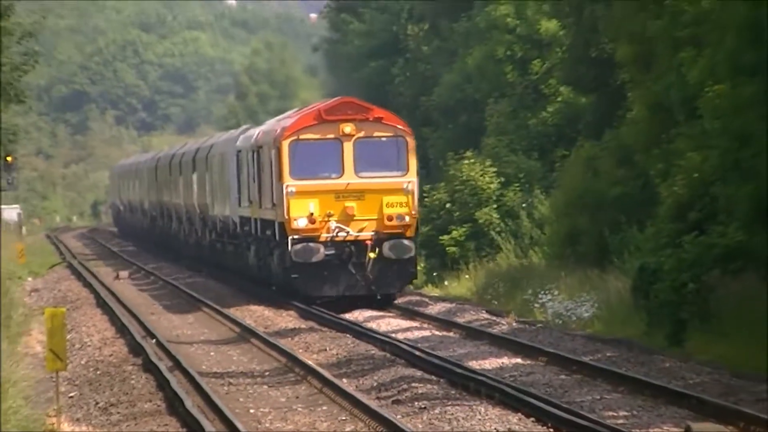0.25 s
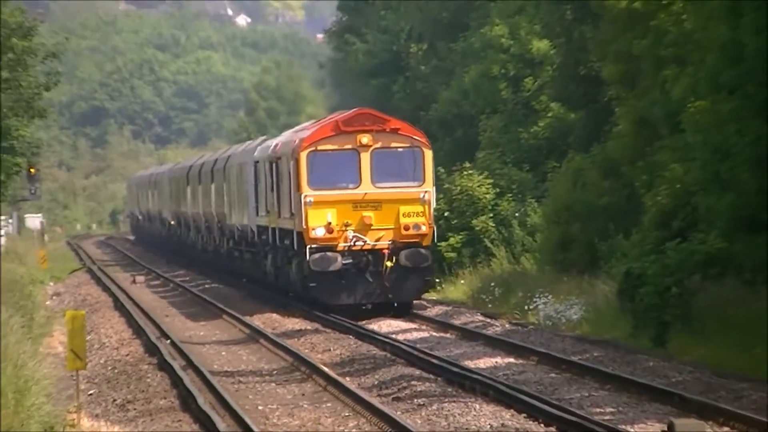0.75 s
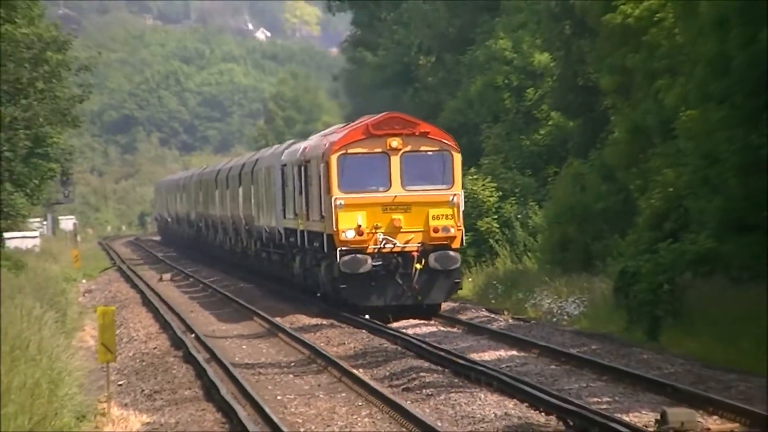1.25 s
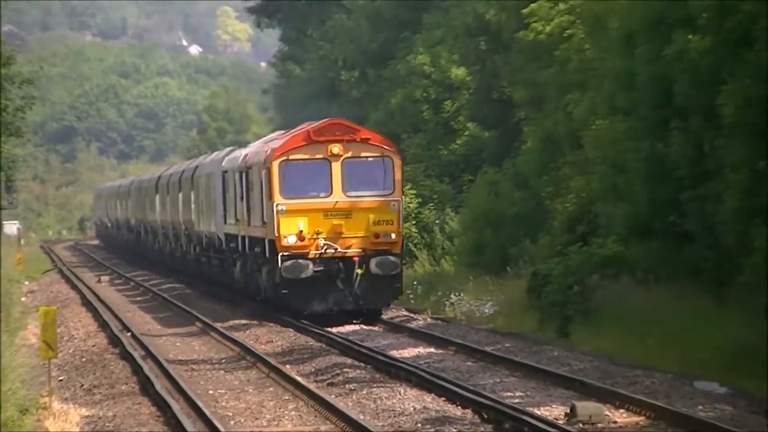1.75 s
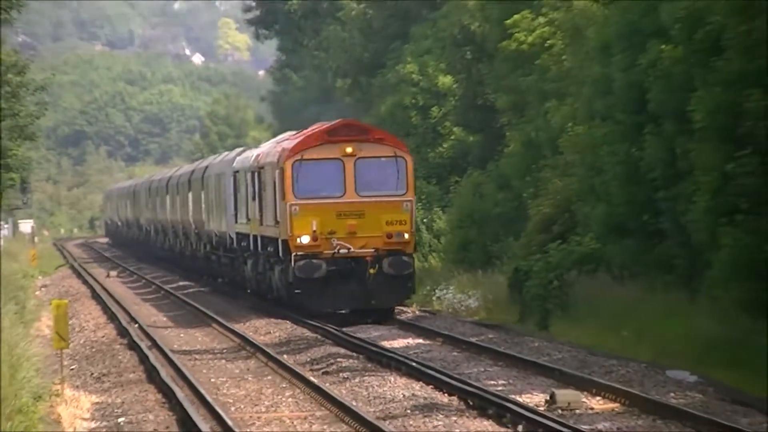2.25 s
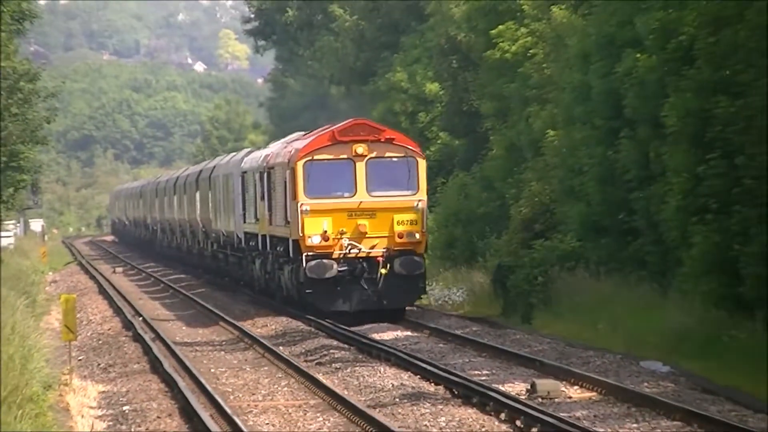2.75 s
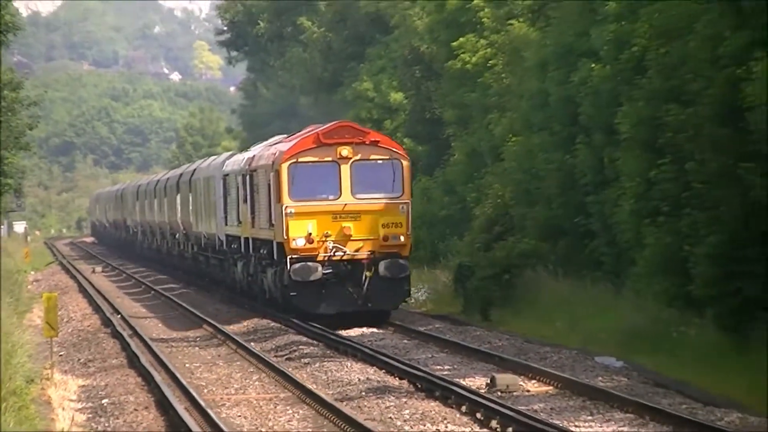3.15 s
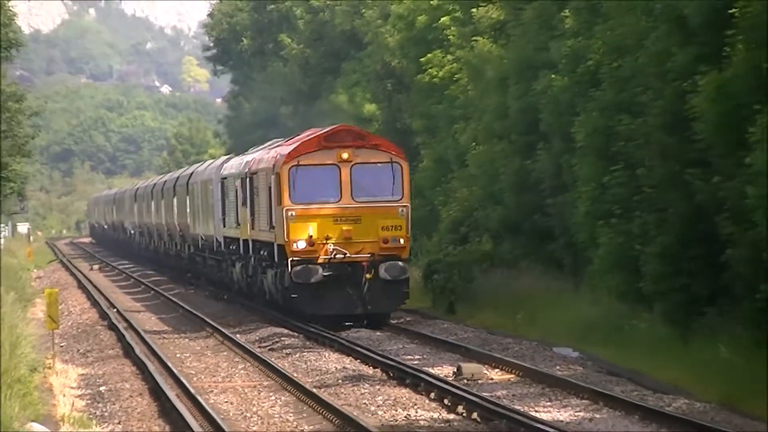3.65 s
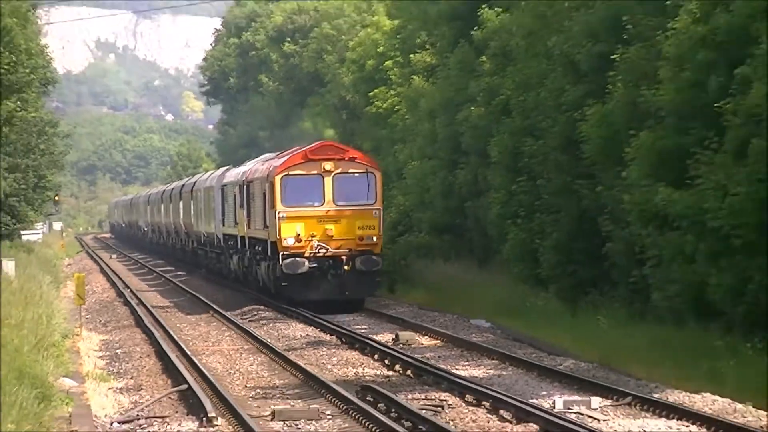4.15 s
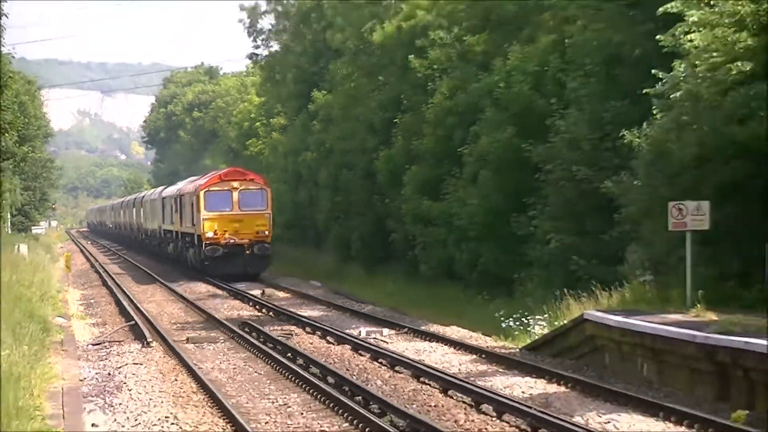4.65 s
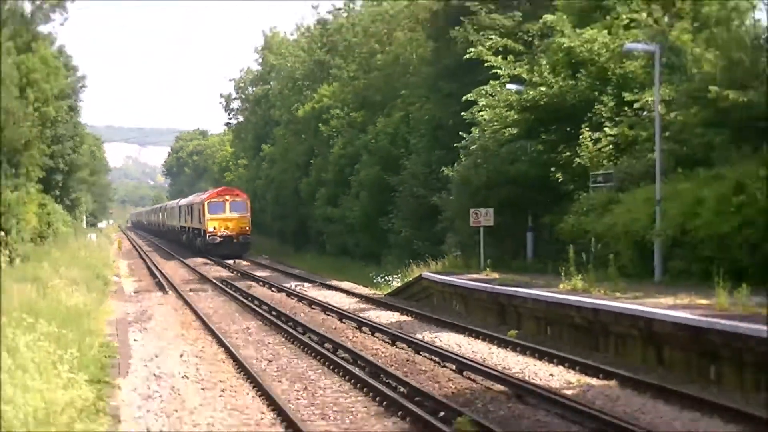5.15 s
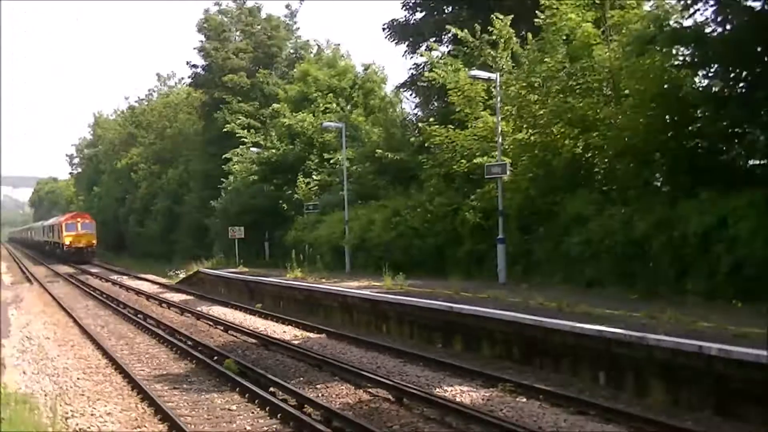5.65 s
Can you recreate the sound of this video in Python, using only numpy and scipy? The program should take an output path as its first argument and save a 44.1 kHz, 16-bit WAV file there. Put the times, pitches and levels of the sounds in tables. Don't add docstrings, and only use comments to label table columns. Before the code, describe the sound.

Outdoors at a country station, a wren whistles sharp high notes and a fast trill over a soft distant train roar. The roar and ringing rails grow gradually. The handheld camera body ticks, faint birds twitter, then a two-tone air horn blasts loudly, low then high, echoing off the trees.

```python
import sys
import numpy as np
from scipy import signal
from scipy.fft import rfft, irfft, next_fast_len
from scipy.io import wavfile
from scipy.ndimage import uniform_filter1d, minimum_filter1d

SR = 44100
rng = np.random.default_rng(int(sys.argv[2]) if len(sys.argv) > 2 else 0)


def file_out(sig):
    cols = np.atleast_2d(sig).T
    lim = np.clip(cols, -1, 1)
    pcm = np.round(lim * 32767).astype(np.int16)
    wavfile.write(sys.argv[1], SR, pcm)


def elevation(decibels):
    levels = np.asarray(decibels, float)
    return 10 ** (levels / 20)


N = 259749
T = np.arange(N) / SR


def shape(x, points):
    hz, db = np.transpose(points)
    size = next_fast_len(N)
    f = np.arange(size // 2 + 1) * SR / size + 1
    gain = elevation(np.interp(np.log(f), np.log(hz), db))
    return irfft(rfft(x, size) * gain, size)[..., :N]


def unit(x):
    return x / np.sqrt(np.mean(x ** 2))


def ring(x, hz, width):
    return signal.lfilter(*signal.iirpeak(hz, hz / width, SR), x)


def lowpass(x, order, hz):
    return signal.sosfilt(signal.butter(order, hz, fs=SR, output="sos"), x)


def walk(rate, size=N):
    k = int(SR / rate)
    levels = np.repeat(rng.standard_normal(size // k + 1), k)
    return 0.96 * uniform_filter1d(levels, k)[:size]


def stereo_noise():
    # pitch_hz, side_minus_mid_db
    side_level = [(60, -18), (100, -11), (170, -18), (290, -13.5), (500, -21), (850, -20.5), (1440, -17.5),
                  (2440, -15.5), (4150, -16), (7050, -19)]
    mid, side = rng.standard_normal((2, N))
    return mid + shape(side, side_level) * np.array([[1], [-1]])


def train():
    # pitch_hz, level_db (per Hz)
    roar_colour = [(30, -43), (80, -44), (120, -30), (200, -24), (310, -13.5), (500, -1.5), (800, -2),
                   (1300, -3), (2500, -9.5), (4000, -14.5), (6300, -22), (8000, -35), (11000, -69),
                   (15500, -63)]
    # pitch_hz, width_hz, level_db
    rail_tones = [(638, 81, -5.5), (1045.6, 59, 1), (1522, 50, -3), (1999, 65, -8), (2936, 140, -11),
                  (3800, 43, -14.5)]
    start_m, speed_m_s = 253, 21.1
    near_db = -20 * np.log10(1 - speed_m_s * T / start_m)
    roar_db = -54.5 + 0.83 * near_db
    rail_db = -55 + 2.19 * near_db
    hiss_db = -62 + 1.79 * near_db

    wide = unit(shape(stereo_noise(), roar_colour))
    low = lowpass(wide, 2, 1700)
    high = wide - low
    rails = 0
    for hz, width, db in rail_tones:
        flicker = elevation(db + 2.4 * walk(9))
        rails = rails + flicker * unit(ring(stereo_noise(), hz, width))
    roar = low * elevation(roar_db + 2.5 + 2.5 * walk(6))
    hiss = high * elevation(hiss_db + 9.5 + 0.67 * walk(4.77))
    return roar + hiss + rails * elevation(rail_db - 3.5)


def camera_motor():
    return unit(ring(stereo_noise(), 11200, 300)) * elevation(-86)


def trees(x, t60, wet_db, delay, apart, dull_hz, near_db):
    t = T[:SR]
    fade = elevation(-60 * t / t60) * np.clip(t / delay, 0, 1)
    fade = fade / np.sqrt(np.sum(fade ** 2))
    twigs = elevation(near_db - 18 - 60 * t / 0.11)
    tail = rng.standard_normal((3, SR)) * (fade + twigs)
    both_sides = tail[0] + apart * tail[1:]
    far = lowpass(x, 1, dull_hz)
    return x + elevation(wet_db) * signal.fftconvolve(far[None], both_sides, axes=1)[:, :N]


def whistle(out, start, length, first_hz, middle_hz, last_hz, db, fall=0.15):
    u = np.arange(int(length * SR)) / (length * SR)
    tremble_hz = 43.3 * np.repeat(rng.standard_normal(100), 100)[:len(u)]
    hz = np.interp(u, [0, .5, 1], [first_hz, middle_hz, last_hz]) + tremble_hz
    phase = 2 * np.pi * np.cumsum(hz) / SR
    swell = np.clip(u / 0.14, 0, 1) * np.clip((1 - u) / fall, 0, 1) * elevation(db - 1)
    at = int(start * SR)
    return out + np.pad(np.sin(phase) * swell, (at, N - at - len(u)))


def trill(out, first_s, period_s, count, note, fall):
    for k in range(count):
        out = whistle(out, first_s + k * period_s, *note, fall=fall)
    return out


def wren():
    # start_s, length_s, pitch_hz, level_db
    slides = [
        (0.351, 0.16, 7130, -47.5),
        (1.105, .085, 6094, -36.5),
        (1.719, 0.08, 6170, -33),
        (2.076, 0.05, 3435, -41),
        (3.359, 0.041, 6650, -36.5),
    ]
    # start_s, length_s, pitch_hz, level_db
    chips = [
        (.117, 0.024, 4840, -39),
        (.202, 0.018, 4810, -37),
        (.263, .049, 4890, -43.5),
        (0.949, 0.1, 4770, -35),
        (2.019, 0.0195, 5430, -31.5),
        (3.679, 0.11, 7270, -43),
        (3.834, 0.12, 7200, -46.5),
    ]
    # start_s, length_s, pitch_hz, level_db
    droops = [
        (.048, .059, 5560, -49),
        (3.518, 0.13, 7410, -42),
    ]
    # start_s, length_s, pitch_hz, level_db
    arches = [
        (0.547, .17, 7410, -48),
        (0.775, 0.15, 7320, -48),
    ]
    # start_s, length_s, pitch_hz, level_db
    rises = [
        (0.503, 0.028, 4370, -39.5),
        (0.716, 0.056, 4300, -44),
        (1.382, 0.045, 4776, -34),
        (1.709, 0.022, 6320, -39),
    ]
    # start_s, length_s, pitch_hz, level_db
    lifts = [
        (1.995, 0.015, 5400, -34.5),
        (2.402, 0.045, 4275, -36.5),
        (3.379, 0.085, 6345, -36),
    ]
    # start_s, length_s, pitch_hz, level_db
    holds = [
        (.001, 0.019, 4680, -52),
        (1.224, 0.035, 4680, -37),
        (1.548, 0.053, 4703, -30.5),
        (1.758, 0.052, 2370, -55),
        (2.216, 0.128, 7287, -39),
        (2.254, 0.023, 2600, -53.5),
    ]
    # start_s, length_s, pitch_hz, level_db
    plunges = [
        (.005, 0.044, 5740, -40.5),
    ]
    # start_s, length_s, pitch_hz, level_db
    dips = [
        (2.176, 0.0447, 7220, -36.5),
    ]
    kinds = [(1.08, .9, slides), (1.055, .955, chips), (1.025, .92, droops), (0.94, .905, arches),
             (0.96, 1.06, rises), (0.94, 1.015, lifts), (1.005, 1.02, holds), (1.21, .865, plunges),
             (1.025, 1, dips)]
    out = np.zeros(N)
    for first, last, notes in kinds:
        for start, length, hz, db in notes:
            out = whistle(out, start, length, first * hz, hz, last * hz, db)

    out = trill(out, 1.279, .1635, 3, (.047, 4270, 3900, 3200, -38), fall=.2)
    out = trill(out, 1.827, .0277, 6, (.007, 6600, 5500, 4400, -41.5), fall=.44)
    out = trill(out, 2.476, .097, 9, (.018, 5300, 5900, 6350, -47), fall=.44)
    out = trill(out, 2.496, .097, 9, (.036, 6150, 4550, 3400, -31), fall=.44)
    out = trill(out, 3.505, .16, 3, (.011, 5700, 7050, 7550, -45), fall=.2)
    flutter = elevation(2.5 * walk(160))
    return trees(out * flutter, t60=0.48, wet_db=-1.1, delay=0.0049, apart=0.24, dull_hz=12000, near_db=-15.5)


def far_birds():
    # start_s, length_s, pitch_hz, width_hz, level_db
    calls = [
        (0.232, 0.088, 6200, 1290, -58.5),
        (1.293, 0.19, 8000, 1800, -71),
        (4.487, .1, 6970, 500, -63),
        (4.734, 0.13, 6550, 700, -61.5),
    ]
    out = 0
    for start, length, hz, width, db in calls:
        u = (T - start) / length
        swell = np.clip(u / 0.21, 0, 1) * elevation(-14 * np.clip(u - 1, 0, None))
        band = unit(ring(ring(stereo_noise(), hz, width), hz, width))
        out = out + band * swell * elevation(db + walk(40))
    return out


def ticks():
    # start_s, level_db, pitch_hz
    tick_events = [
        (3.496, -27.5, 2847),
        (3.813, -35, 4500),
        (4.1234, -16.5, 5120),
    ]
    out = np.zeros(N)
    for start, db, hz in tick_events:
        t = np.clip(T - start, 0, None)
        crack = rng.standard_normal(N) * (t > 0) * elevation(-60 * t / 0.007)
        crack[int(start * SR) + 1] = 3.0
        bright = ring(ring(ring(crack, hz, 2900), hz, 3000), hz, 4600)
        body = ring(ring(ring(crack, 2700, 2100), 2600, 2900), 2600, 4000)
        out += elevation(db + 3.5) * (bright + 1.17 * body + 0.018 * crack)
    return out


def horn(start, held, reed_hz, held_db, drain_db, attack, reed, bell, top):
    at = int(start * SR)
    t = T[at:] - start
    shut = np.clip((t - held) / .03, 0, 1)
    sharp, settle, swing, bend = reed
    sharpness = sharp * np.exp(-(t / settle) ** 2 / 2)
    swinging = swing * np.exp(-(t / .058) ** 4) * np.cos(2 * np.pi * 41 * t)
    hz = reed_hz * (1 + sharpness + bend * np.sin(np.pi * shut) + swinging)
    phase = 2 * np.pi * np.cumsum(hz) / SR

    db = held_db - 16 * np.clip(1 - t / attack, 0, 1) + drain_db * shut ** 1.55
    treble_db = -24 * np.clip(1 - t / (1.45 * attack), 0, 1) ** .35 - 44 * shut ** 3.2
    drained = held + .08
    gate = np.clip(t / 0.0042, 0, 1) * np.clip((drained - t) / 0.028, 0, 1)

    orders = list(bell)
    for k in range(len(bell) + 1, int(15500 / reed_hz)):
        orders.append((k, np.interp(k * reed_hz, *np.transpose(top))))
    tone = 0
    for k, d in orders:
        level = elevation(d + treble_db * min(k / 18, 1.3) + 2.1 * walk(30, size=len(t)))
        tone = tone + level * np.cos(k * phase + 0.021 * k * k)

    air_colour = [(200, -46), (700, -13), (2000, -6), (7000, -9), (10000, -14), (15000, -44)]  # (Hz, dB)
    air = unit(shape(rng.standard_normal(N), air_colour))[at:]
    rasp = elevation(-26 + .3 * treble_db) * air * (1 + 0.63 * np.cos(phase))
    return np.pad(gate * elevation(db) * (unit(tone) + rasp), (at, 0))


def two_tone_horn():
    # multiple, level_db
    low_bell = [(1, -37), (2, -0.5), (3, -6.5), (4, -4), (5, -1), (6, -6), (7, -7), (8, -16), (9, -8),
                (10, -16.5), (11, -17.5), (12, -15.5), (13, -19), (14, -15)]
    # pitch_hz, level_db
    low_top = [(4700, -15), (6600, -20), (8400, -40.5), (9400, -30.5), (15500, -63)]
    # multiple, level_db
    high_bell = [(1, -30), (2, -13), (3, -1), (4, -6.5), (5, -9), (6, -8.5), (7, -17.5), (8, -12.5),
                 (9, -17), (10, -20.5), (11, -16), (12, -21), (13, -19.5), (14, -21.5)]
    # pitch_hz, level_db
    high_top = [(5300, -16.5), (6400, -28.5), (7100, -38), (8200, -33), (9400, -38.5), (15500, -65)]
    low = horn(start=5.417, held=.168, reed_hz=312.7, held_db=-11.5, drain_db=-10.5, attack=.01,
               reed=(0.079, .012, 0.033, -0.044), bell=low_bell, top=low_top)
    high = horn(start=5.66, held=.168, reed_hz=355.5, held_db=-8.5, drain_db=-20, attack=.0065,
                reed=(.056, 0.0144, 0.00083, 0.033), bell=high_bell, top=high_top)
    return trees(low + high, t60=.5, wet_db=-10, delay=.06, apart=0.3, dull_hz=3300, near_db=-20)


def scene():
    return train() + camera_motor() + wren() + far_birds() + ticks() + two_tone_horn()


def gain_control(x):
    full_db, aim_db, listen_s, lag_s = 2.5, -8, 0.0092, .002
    dive_db_s, recover_db_s = 1600, 288
    size = int(listen_s * SR)
    peak = -minimum_filter1d(-np.abs(x).max(axis=0), size, origin=(size - 1) // 2)
    gain_db = np.minimum(aim_db - 20 * np.log10(peak + 1e-9), full_db)
    gain_db = np.minimum.accumulate(gain_db - recover_db_s * T) + recover_db_s * T
    gain_db = np.maximum.accumulate(gain_db + dive_db_s * T) - dive_db_s * T
    late_db = np.interp(T - lag_s, T, gain_db)
    return x * elevation(uniform_filter1d(late_db, int(lag_s * SR)))


def amplifier_noise():
    rumble = unit(shape(rng.standard_normal((2, N)), [(20, 10), (150, -9), (400, -26.0)]))
    hiss = unit(shape(stereo_noise(), [(3000, -13), (8000, 0), (11000, 0), (14000, 3), (15500, -14)]))
    return elevation(-95.5 + 4 * walk(8)) * rumble + elevation(-100.5) * hiss


def roll_off(x):
    return signal.sosfilt(signal.butter(12, 15700, fs=SR, output="sos"), x)


def record(dry):
    # pitch_hz, left_minus_right_db
    lean = [(60, 6.5), (100, 2), (170, -2), (290, -2), (500, -3), (850, -2.5), (1440, -2), (2440, -0.5),
            (4150, -0.5), (7050, -2)]
    dry = gain_control(dry)
    dry = np.tanh(dry * .8) / .8
    dry = signal.sosfilt(signal.butter(2, 150, "high", fs=SR, output="sos"), dry)
    left = shape(dry[0], [(hz, db / 2) for hz, db in lean])
    right = shape(dry[1], [(hz, -db / 2) for hz, db in lean])
    return roll_off(np.array([left, right]) + amplifier_noise())


dry = scene()
out = record(dry)
file_out(out)
```